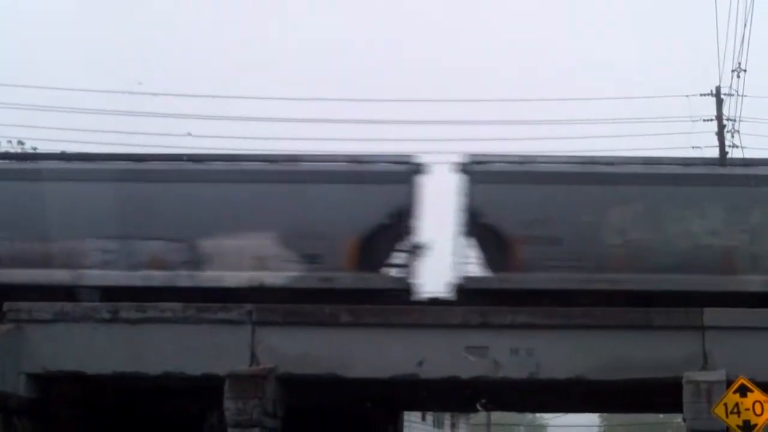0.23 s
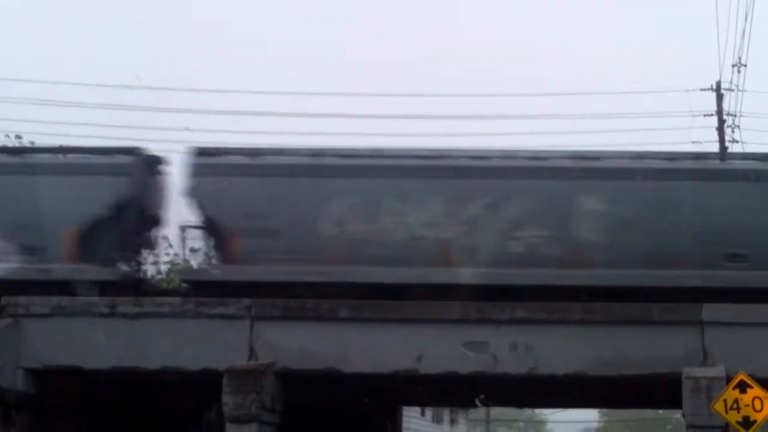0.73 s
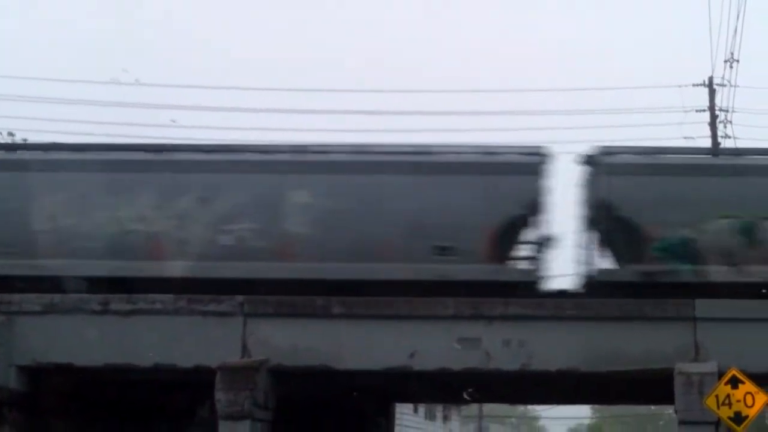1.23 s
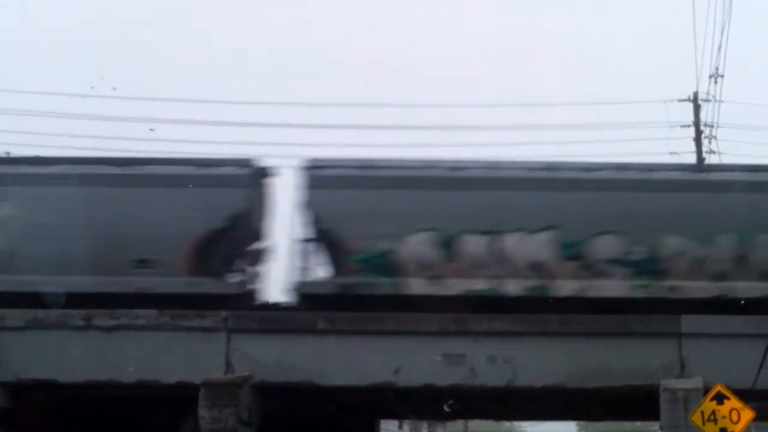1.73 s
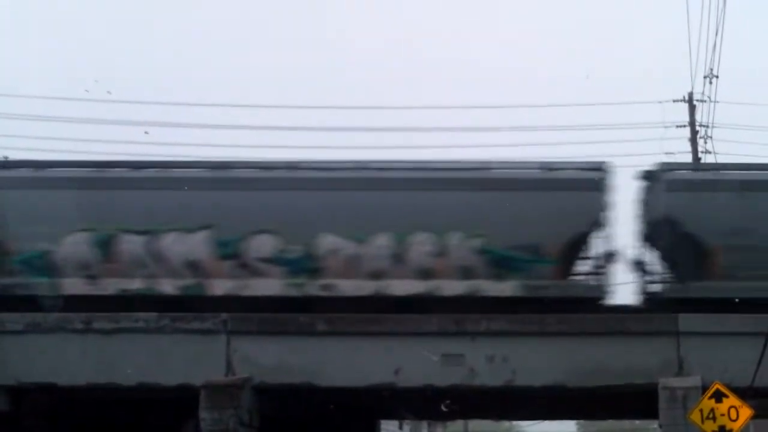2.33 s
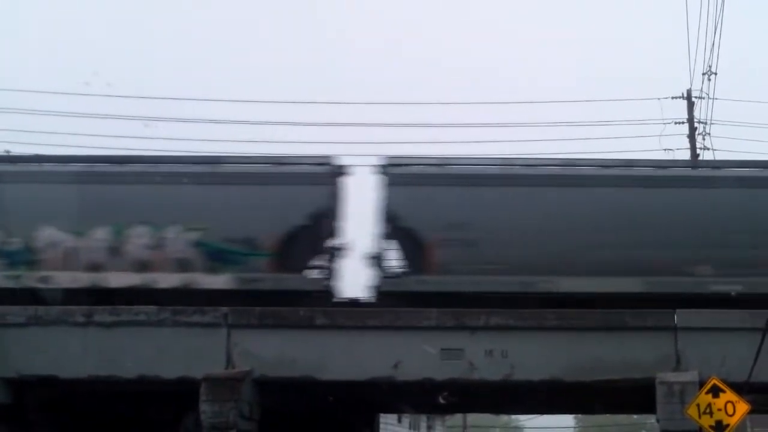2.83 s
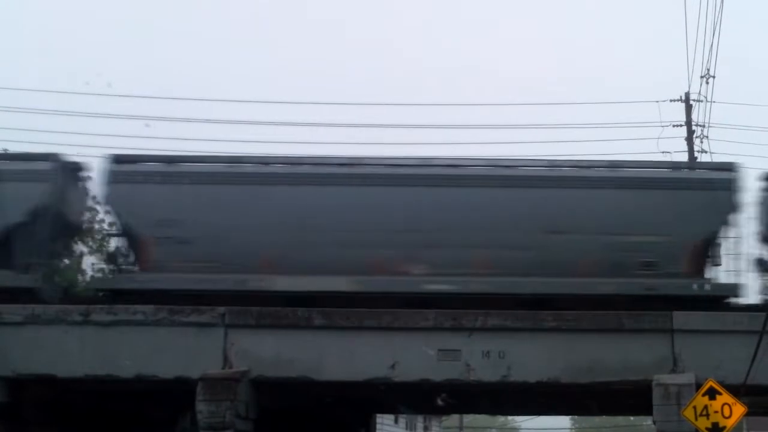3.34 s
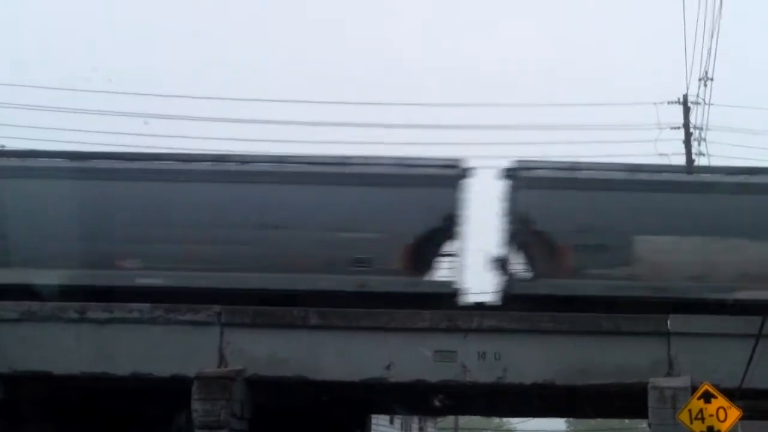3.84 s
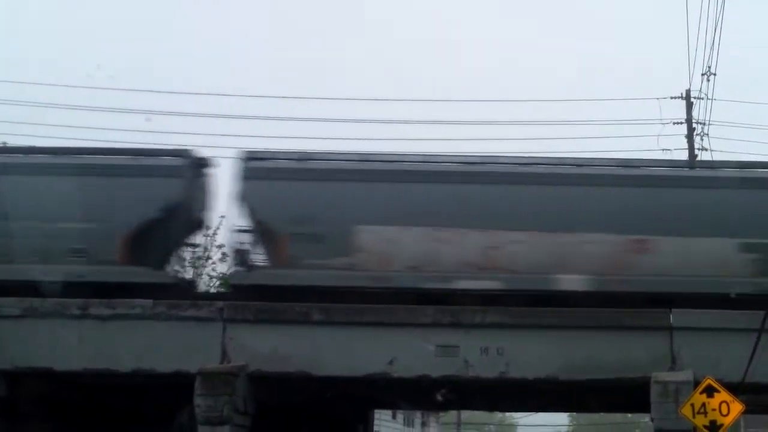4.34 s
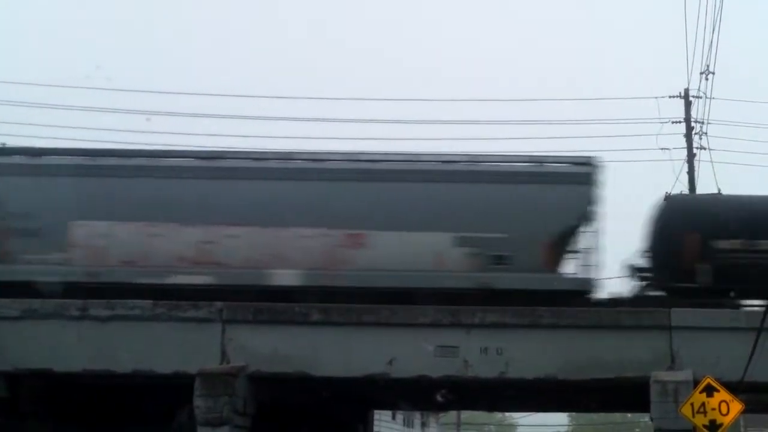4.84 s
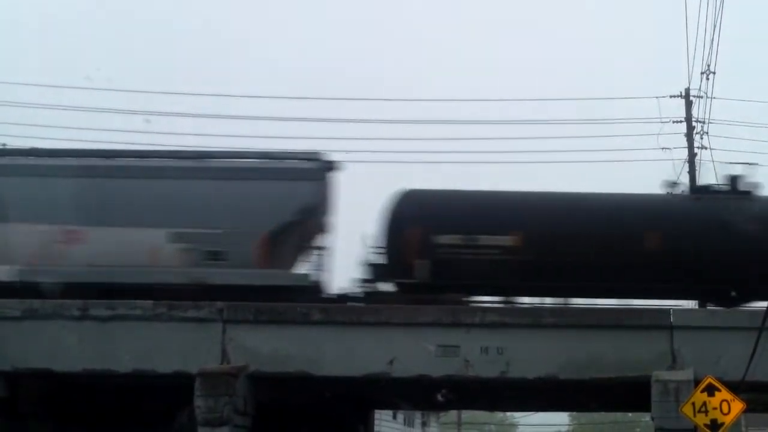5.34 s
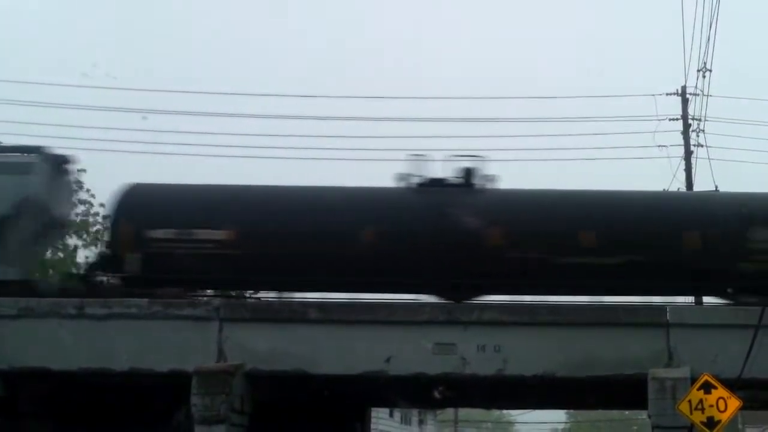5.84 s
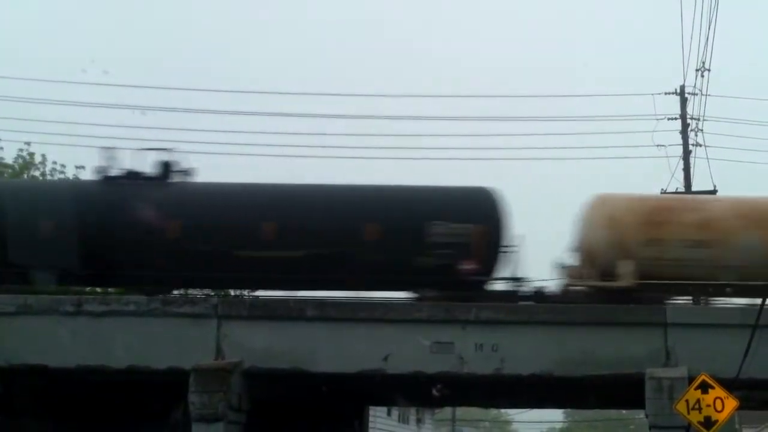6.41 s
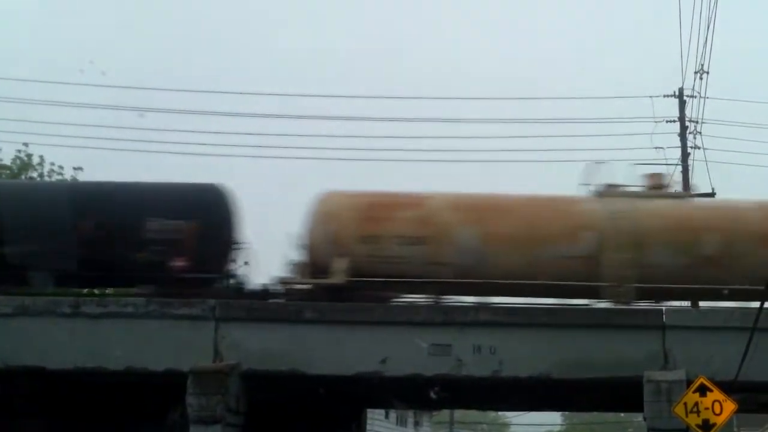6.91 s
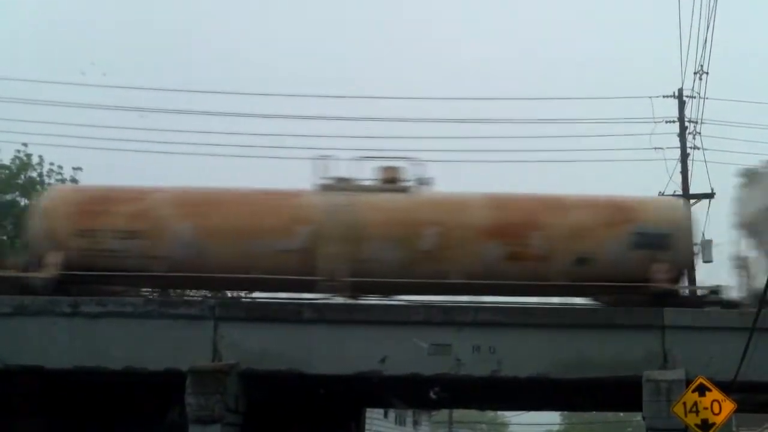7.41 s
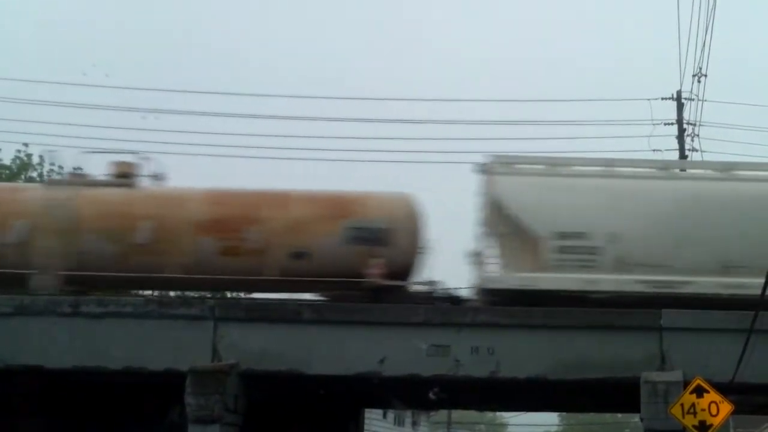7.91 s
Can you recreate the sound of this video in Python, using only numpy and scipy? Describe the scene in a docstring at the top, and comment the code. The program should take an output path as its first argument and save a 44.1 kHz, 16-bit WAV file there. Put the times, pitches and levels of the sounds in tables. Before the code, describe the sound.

A freight train is already crossing a bridge, heard close by outdoors. Throughout, sub-bass rumble and a fluttering 50-70 Hz deck boom sit beneath girder drone, mid-low wheel roar and bright gritty rail hiss. At 0.1 s a high squeal and whistle sing over flange sizzle; a clack lands at 0.2. Four clacks follow at 1.0-1.45, then a complex bright squeal with a low groan at 1.6-2.0. Harder clacks at 2.3-2.7 end in a sharp crack; a scraping squeal swells at 3.3. Strong clacks at 3.5-3.95 mix with squeals and a thud. Clacks at 4.8-5.2 begin weaker, as tank cars replace hoppers and the drone shifts; a thin squeal comes at 5.3. Clacks return at 6.0-6.4 and 7.3-7.7, with a girder boom at 7.2. A 440 Hz groan sings near 7.55, then sizzle and a faint squeal at 8.0 as rolling continues.

```python
"""Beside a street overpass, a freight train of hoppers and then tank cars rolls across the bridge.
Filtered noise makes the deck boom and the girders drone, and makes the wheels roar and hiss on the rails.
Axles clack over a joint, mostly four to a coupling: short blows ring the modes of a wheel.
Now and then a flange rubs the rail and sizzles; wheels squeal in rough modes or whistle clear tones."""
import sys
import numpy as np
from scipy import signal
from scipy.fft import rfft, irfft
from scipy.io import wavfile
from scipy.ndimage import uniform_filter1d, minimum_filter1d, map_coordinates

SR = 44100
rng = np.random.default_rng(int(sys.argv[2]) if len(sys.argv) > 2 else 0)


def dump(signal):
    """Clip the signal to [-1, 1] and save it as 16-bit WAV at the path in sys.argv[1]."""
    limited = np.clip(np.atleast_2d(signal).T, -1, 1)
    pcm = np.round(limited * 32767).astype(np.int16)
    wavfile.write(sys.argv[1], SR, pcm)


N = 359856
TIME = np.arange(N) / SR

# colour of steel scraping and slipping: pitch_hz, density_db (relative, per Hz)
SIZZLE_COLOUR = [(6000, -12), (8000, 10), (10000, 11.5), (11500, 3.5), (12600, 0.5), (14000, -4),
                 (15600, -6)]


def from_db(db):
    """Decibels to gain."""
    return 10 ** (np.asarray(db) / 20)


def rms_one(x):
    """Scale to unit power."""
    return x / np.sqrt(np.mean(x ** 2) + 1e-20)


def gains(rows):
    """The dB columns of a curve table as gains at every sample."""
    s, *columns = np.transpose(rows)
    return [from_db(np.interp(TIME, s, c)) for c in columns]


def noise(colour):
    """Unit-power noise of a given colour, silent beyond the ends of its table."""
    hz, db = np.transpose(colour)
    bins = np.maximum(np.arange(N // 2 + 1) * SR / N, 1)
    shape = from_db(np.interp(np.log(bins), np.log(hz), db, left=-np.inf, right=-np.inf))
    white = rng.standard_normal(N)
    return rms_one(irfft(rfft(white) * shape, N))


def resonate(force, modes):
    """Parallel two-pole resonances of alternating sign, each with its own gain at its peak."""
    out = 0
    for k, (hz, width_hz, db) in enumerate(modes):
        r = np.exp(-np.pi * width_hz / SR)
        poles = [1, -2 * r * np.cos(2 * np.pi * hz / SR), r * r]
        mode = (1 - r * r) / 2 * signal.lfilter([1, 0, -1], poles, force)
        out = out + (-1) ** k * from_db(db) * mode
    return out


def shaken(modes, size=N):
    """A body driven by random roughness, near its modes only."""
    hz = np.array(modes)[:, 0]
    edges_hz = [hz.min() * .75, min(hz.max() * 1.25, SR * .45)]
    band = signal.butter(2, edges_hz, "band", fs=SR, output="sos")
    roughness = signal.sosfilt(band, rng.standard_normal(size))
    return rms_one(resonate(roughness, modes))


def even(x, span_s):
    """Hold the power steady over stretches longer than the span."""
    size = max(int(span_s * SR), 2)
    power = uniform_filter1d(uniform_filter1d(x * x, size), size)
    return x / np.sqrt(np.maximum(power, 1e-9))


def flutter(db):
    """A gain that wavers a few times a second."""
    return from_db(db * noise([(1.5, 7.0), (6, -1.0), (14, -9), (30, -11.0)]))


def swell(s, length_s):
    """A smooth hump of height 1."""
    return np.exp(-((TIME - s) / length_s) ** 2)


def girder_booms():
    """One mode of the girders booms up for a moment."""
    # booming girder modes: peak_s, level_db, pitch_hz
    boom_events = [(1.13, -22.5, 178), (2.6, -28, 186), (3.66, -25, 163), (7.24, -20, 130)]
    width_hz, length_s = 43, 0.093
    out = 0
    for s, db, hz in boom_events:
        mode = even(shaken([(hz, width_hz, 0)]), span_s=0.11)
        out = out + from_db(db) * swell(s, length_s) * mode
    return out


def bridge(sub_db, boom_db, girder_db, broad_db):
    """The moving load shakes the deck in its low modes and the girders above them."""
    # load on the bridge, before trim and flutter: time_s, sub_db, deck_boom_db, girder_drone_db
    load = [(0, -15.5, -21.5, -23.5), (0.6, -18, -18.5, -24.5), (1.4, -15, -19, -29),
            (1.75, -22, -16.5, -28), (2.1, -20.5, -14.5, -24), (2.8, -19.5, -21.5, -29.5),
            (3.1, -16, -12.5, -28), (3.65, -23.5, -20.5, -26), (4.15, -21, -16, -26.5),
            (5.5, -24.5, -16, -25), (7, -22, -16, -24), (8.16, -36, -14.5, -25.5)]
    # tank cars take over from hoppers: time_s, share (0-1)
    tank_share = [(0, 0.02), (3.7, 0.08), (5.3, 0.89), (8.16, 0.85)]
    # resonances of the deck: pitch_hz, width_hz, level_db
    deck_modes = [(37.7, 14.5, -7), (53.5, 9.9, 0.5), (72.2, 6.7, -4.5)]
    # colour of the sub rumble: pitch_hz, density_db (relative, per Hz)
    sub_colour = [(5, -18), (13, -2.5), (23, -5.5), (35, 2), (42, -7), (60, -70)]
    # colour of the broad deck boom: pitch_hz, density_db (relative, per Hz)
    boom_colour = [(25, 3.5), (38, -4.5), (52, 9), (62, -13), (76, -1.5), (90, -1.5), (130, -45)]
    # girder drone under hoppers: pitch_hz, density_db (relative, per Hz)
    hopper_colour = [(60, -4), (92, 1), (106, -4), (118, -4), (145, 2), (170, 0.5), (195, 1), (220, -6),
                     (245, -13.5), (275, -11), (305, -26), (420, -36)]
    # girder drone under tank cars: pitch_hz, density_db (relative, per Hz)
    tank_colour = [(60, -31), (92, -5.5), (118, 5.5), (140, -0.5), (195, 0.5), (225, -7.5), (275, -6.5),
                   (305, -11.5), (350, -12.5), (430, -34), (500, -11.5), (550, -12.5), (600, -18)]

    sub, boom, drone = gains(load)
    sub = sub * flutter(db=2.0)
    boom = boom * flutter(db=2.5)
    drone = drone * flutter(db=1.3)
    booms = girder_booms()
    tanks = np.clip(np.interp(TIME, *np.transpose(tank_share)), 0, 1)
    deck = even(shaken(deck_modes) + from_db(broad_db) * noise(boom_colour), span_s=0.051)
    # equal-power crossfade from hoppers to tank cars
    girders = np.sqrt(1 - tanks) * noise(hopper_colour) + np.sqrt(tanks) * noise(tank_colour)
    girders = even(girders, span_s=0.23)
    rumble = from_db(sub_db) * sub * even(noise(sub_colour), span_s=0.16)
    return rumble + from_db(boom_db) * boom * deck + from_db(girder_db) * drone * girders + booms


def thuds():
    """A wheel drops into a loose joint: a sleeper's main mode and its overtone swell briefly."""
    # deck thuds: peak_s, level_db, length_s, pitch_hz
    thud_events = [(2.69, -27, 0.026, 476), (3.51, -28, 0.03, 497), (3.941, -22, 0.013, 440),
                   (4.82, -29.5, 0.04, 440), (7.19, -26, 0.028, 493)]
    # overtone of every thud: pitch_hz, width_hz, level_db
    overtone = (970, 31, -9)
    out = 0
    for s, db, length_s, hz in thud_events:
        body = even(shaken([(hz, 28, 0), overtone]), span_s=0.018)
        out = out + from_db(db) * swell(s, length_s) * body
    return out


def surges_and_dips_db():
    """Surges of the rolling noise, and brief dips of its level, in dB; each dip falls abruptly, then recovers."""
    # smooth surges: peak_s, rise_db, half_length_s
    surge_events = [(0.22, 3, 0.027), (0.622, 3.5, 0.031), (2.675, 4, 0.037), (3.572, 3.5, 0.13),
                    (3.936, 3, 0.1), (4.387, 1.5, 0.027), (4.848, 4.5, 0.034), (5.553, 1.5, 0.084),
                    (5.99, 3.5, 0.12), (6.823, 2, 0.034), (7.208, 5, 0.043), (7.674, 4, 0.059),
                    (7.976, 1.5, 0.014)]
    # abrupt level dips: start_s, depth_db, recovery_s
    dip_events = [(0.64, 4, 0.054), (1.25, 3, 0.17), (3.69, 7, 0.13), (4.429, 7.5, 0.19), (5.62, 6, 0.25),
                  (7.9, 2.5, 0.042)]
    onset_s = 0.0053
    surges = sum(db * swell(s, length_s) for s, db, length_s in surge_events)
    dips = 0
    for s, db, recovery_s in dip_events:
        dips = dips + np.interp(TIME - s, [0, onset_s, onset_s + recovery_s], [0, db, 0])
    return surges - dips


def flange_pressure():
    """Each rub of a flange on the rail builds up and dies away exponentially."""
    # flange rubs, before the sizzle and scrape trims: loudest_s, level_db, rise_s, fall_s
    rub_events = [(0.08, -44, 0.27, 0.3), (0.72, -55, .03, 0.16), (1.68, -43.5, 0.11, 0.22),
                  (2.7, -47.5, 0.0099, 0.21), (3.28, -42.5, 0.11, 0.24), (3.65, -49, 0.046, .1),
                  (3.88, -51, .1, 0.28), (5.32, -43.5, 0.18, 0.21), (6.83, -46, .02, 0.06),
                  (7.99, -46, 0.031, 0.75)]
    pressure = 0
    for s, db, rise_s, fall_s in rub_events:
        decay = np.maximum((s - TIME) / rise_s, (TIME - s) / fall_s)
        pressure = pressure + from_db(db) * np.exp(-decay)
    return pressure


def screech(width_hz, smooth_db):
    """Scraping noise, partly caught in the wheel's crowded high modes."""
    centres_hz = np.arange(6000, 15500, 320)
    centres_hz = centres_hz + rng.uniform(-110, 110, len(centres_hz))
    modes = [(hz, width_hz, 0) for hz in centres_hz]
    caught = rms_one(resonate(noise(SIZZLE_COLOUR), modes))
    return rms_one(caught + from_db(smooth_db) * noise(SIZZLE_COLOUR))


def rolling(roar_db, ring_db, hiss_db, sizzle_db, scrape_db, slip_db, sleeper_db, rail_db,
            tread_db, grit_db, roar_follows, ring_follows):
    """Rough treads excite sleepers, rail and wheels; a rubbing flange scrapes and adds a gritty sizzle."""
    # wheels on the rail, before trim, surges and dips: time_s, roar_db, ring_and_hiss_db
    rolling_levels = [(0, -29.5, -32), (1, -30, -33), (1.5, -32.5, -34), (3, -33.5, -35), (3.5, -33, -34.5),
                      (4.1, -32, -34), (5, -32.5, -35.5), (6.3, -31, -33.5), (7.4, -31.5, -33.5),
                      (8.16, -30.5, -33.5)]
    # resonances of the sleepers: pitch_hz, width_hz, level_db
    sleeper_modes = [(368, 51, -1), (432, 97, -1.5), (524, 52, -3), (681, 57, -8.5), (797, 52, -6.5),
                     (867, 76, -8), (988, 32, -10)]
    # resonances of the rail: pitch_hz, width_hz, level_db
    rail_modes = [(1465, 60, -3), (1597, 55, 1), (1745, 90, -3), (1910, 80, -3), (2170, 110, -3),
                  (2550, 160, -7), (2820, 140, -8)]
    # resonances of all rolling wheels: pitch_hz, width_hz, level_db
    tread_modes = [(3100, 120, -4), (3316, 200, -1.5), (3952, 92, 5), (4360, 230, 1), (4950, 210, -5.5),
                   (5500, 350, -6), (6330, 510, -5), (6820, 260, -1.5), (8120, 140, -0.5),
                   (9500, 950, -6.5)]
    # colour of the low roar: pitch_hz, density_db (relative, per Hz)
    roar_colour = [(230, -12.5), (300, -3.5), (370, 0.5), (450, 0.5), (540, -0.5), (620, -25), (690, -7.5),
                   (850, -6), (990, -9.5), (1080, -26), (1400, -19)]
    # colour of the middle ring: pitch_hz, density_db (relative, per Hz)
    ring_colour = [(750, -28), (1100, -0.5), (1500, -2.5), (2200, -3), (2900, -4), (3600, -2.5),
                   (5000, -38)]
    # colour of the high hiss: pitch_hz, density_db (relative, per Hz)
    hiss_colour = [(1710, -7), (2900, -6), (3380, -4.5), (3680, -7.5), (4780, 1), (6110, -1.5), (6780, -2),
                   (7490, -4), (8200, -5.5), (9310, -5.5), (12600, -27.5), (15500, -28)]

    roar, steel = gains(rolling_levels)
    change_db = surges_and_dips_db()
    flange = flange_pressure()
    steel = steel * flutter(db=0.83)
    roar = roar * from_db(roar_follows * change_db) * flutter(db=1.3)
    ring = steel * from_db(ring_follows * change_db)
    hiss = steel * from_db(change_db)

    slip = from_db(slip_db) * hiss * noise(SIZZLE_COLOUR)
    sizzle = flange * screech(width_hz=60, smooth_db=3) + slip
    # the contact force flutters quickly
    grit = from_db(grit_db * noise([(5, 11.5), (40, -6), (200, -17), (500, -36)]))

    low = roar * even(noise(roar_colour) + from_db(sleeper_db) * shaken(sleeper_modes), span_s=0.049)
    middle = ring * rms_one(noise(ring_colour) + from_db(rail_db) * shaken(rail_modes))
    wheel_tone = rms_one(noise(hiss_colour) + from_db(tread_db) * shaken(tread_modes))
    wheels = np.hypot(hiss, from_db(scrape_db) * flange) * wheel_tone
    top = from_db(hiss_db) * wheels + from_db(sizzle_db) * sizzle
    return from_db(roar_db) * low + grit * (from_db(ring_db) * middle + top)


def reflections(x, share, sway_s):
    """Passing car sides throw back early echoes, whose slowly changing delays ripple the colour."""
    out = x.copy()
    for delay_s in (.0037, .0066, .0112):
        path_s = delay_s + sway_s * noise([(.5, -6), (1.5, 15), (3, -18)])
        out += share * map_coordinates(x, [(TIME - path_s) * SR], order=3, mode="mirror")
    return out / np.sqrt(1 + 3 * share ** 2)


def clacks(ring_db, crack_db, chatter_db, rise_s, choke, echo_s, echo_db):
    """Each axle meets the rail end, strikes and chatters; a short blow chokes its ring; a car side echoes."""
    # axles at the joint, before trims: strike_s, wheel_ring_db, crack_db, clatter_length_s
    axles = [(0.2, -22.5, -27, 0.017), (1.039, -26.5, -35, 0.016), (1.165, -21.5, -30, 0.0084),
             (1.327, -33.5, -43, .012), (1.45, -28.5, -25, 0.012), (2.295, -26, -22, 0.023),
             (2.415, -27, -26, 0.04), (2.577, -28, -25, 0.017), (2.706, -24.5, -18.5, .007),
             (3.546, -25.5, -25, 0.025), (3.667, -23.5, -21, .009), (3.827, -25.5, -35, 0.0046),
             (3.955, -21.5, -21, 0.0027), (4.787, -38, -36, .015), (4.914, -32, -31, 0.011),
             (5.069, -31, -32, 0.014), (5.183, -29, -22, 0.029), (6.029, -29, -36, .01),
             (6.157, -28.5, -23, 0.012), (6.317, -31, -24.5, 0.049), (6.436, -26, -25.5, 0.028),
             (7.266, -27.5, -41, .01), (7.389, -27.5, -35, 0.019), (7.674, -25, -28, 0.0064)]
    # modes of a struck wheel, before choking widens them: pitch_hz, width_hz, level_db
    wheel_modes = [(1465, 45, -8), (1595, 30, 0), (1730, 60, -9), (1920, 40, -11), (2160, 45, -14),
                   (2500, 45, -21)]
    # crack of steel on steel: pitch_hz, density_db (relative, per Hz)
    crack_colour = [(350, 2), (900, 6), (1250, 1), (2000, 1), (2900, 4), (4500, -1), (6000, -8),
                    (10000, -12), (14000, -36)]

    out = np.zeros(N)
    crack = noise(crack_colour)
    lead = SR // 30   # samples before the strike
    age_s = (np.arange(SR // 5) - lead) / SR
    for s, wheel_db, hit_db, length_s in axles:
        blow = np.exp(-np.maximum(-age_s / rise_s, age_s / length_s))
        chatter = blow * rng.standard_normal(len(age_s))
        force = from_db(chatter_db) * chatter / np.linalg.norm(chatter)
        force[lead] += 1   # the impact itself
        choked = [(hz, width_hz + choke / length_s, db) for hz, width_hz, db in wheel_modes]
        ring = resonate(force, choked)
        ring /= np.sqrt(uniform_filter1d(ring ** 2, size=300).max())   # loudest moment at unit power
        at = int(s * SR) - lead + np.arange(len(age_s))
        out[at] += from_db(wheel_db + ring_db) * ring
        out[at] += from_db(hit_db + crack_db) * blow * crack[at]
    return out + from_db(echo_db) * np.interp(TIME - echo_s, TIME, out)


def whistles():
    """Steel sticks and slips in step with one mode: a clear tone, wavering a little in pitch and strength."""
    # singing tones: start_s, loudest_s, end_s, level_db, pitch_hz, glide_hz_per_s, waver_hz
    tones = [(0.04, 0.119, 0.2, -26, 4720, 400, 19), (1.57, 1.69, 1.8, -39, 3850, 0, 12),
             (1.635, 1.685, 1.73, -31, 5100, 0, 7.1), (1.569, 1.69, 1.8, -34, 5372, 0, 8),
             (1.597, 1.7, 1.82, -39, 6730, -100, 16), (1.82, 1.915, 2.02, -39.5, 6700, 0, 11),
             (1.661, 1.86, 2, -33, 426, -1, 4.4), (2.083, 2.12, 2.15, -37, 6760, 800, 20),
             (3.71, 3.778, 4.2, -40, 9717, 0, 14), (4.153, 4.195, 4.25, -35, 3040, -400, 6),
             (5.13, 5.328, 5.6, -38.5, 4335, -2, 15), (5.222, 5.35, 5.5, -43, 10904, -1, 34),
             (7.419, 7.57, 7.76, -27, 441.5, 0, 3), (7.42, 7.6, 7.76, -35.5, 880, 1, 11)]
    flutter_db = 2.5
    out = np.zeros(N)
    waver = noise([(3, 0), (30, 0), (120, -15)])
    strength = from_db(flutter_db * noise([(5, -6), (40, 1), (120, -15)]))
    for start, top, end, db, hz, glide, waver_hz in tones:
        at = np.arange(max(int(start * SR), 0), int(end * SR))
        own = (at + rng.integers(N)) % N   # each tone wavers in its own way
        rise_and_fall = np.interp(TIME[at], [start, top, end], [0, 1, 0])
        pressure = np.sin(np.pi / 2 * rise_and_fall) ** 2
        pitch_hz = hz + glide * (TIME[at] - top) + waver_hz * waver[own]
        tone = np.sqrt(2) * np.sin(2 * np.pi * np.cumsum(pitch_hz) / SR)
        out[at] += from_db(db) * pressure * strength[own] * tone
    return out


def squeals(level_db, fade, steady_s):
    """Steel rubbing on steel drives a few modes unevenly, swelling and dying away within a second."""
    # modes of each singing wheel: pitch_hz, width_hz, level_db
    SONG_A = [(3950, 90, -13), (4605, 60, -1), (4690, 50, -4), (4780, 80, -8), (8130, 350, -15.5),
              (11420, 120, -18), (11750, 300, -20.5)]
    SONG_B = [(3850, 30, -6), (4550, 50, -7), (5113, 40, -5), (5300, 300, -6), (5860, 25, -2),
              (6150, 50, -8), (6400, 40, -6), (6700, 70, -7), (7560, 30, -4), (8230, 25, 2), (9150, 45, -4),
              (9560, 60, -9), (10500, 50, -10), (11080, 50, -9), (12050, 40, -18), (12750, 250, -24),
              (13930, 35, -18)]
    SONG_B_LATE = [(3870, 40, -5), (4300, 16, 0), (5400, 60, -4), (5570, 40, -5), (6660, 30, -3),
                   (7535, 18, 3), (7800, 90, -9), (8400, 160, -4), (9170, 40, -2), (9340, 50, -3),
                   (10450, 50, -7), (11360, 70, -10), (12490, 35, -13), (12850, 250, -21), (13650, 80, -22),
                   (13900, 40, -19), (14500, 150, -24)]
    SONG_C = [(3990, 110, -4), (4650, 150, -8), (5600, 50, -5), (6170, 45, -2), (6370, 60, -4),
              (7920, 220, -5), (8200, 200, -9), (9900, 300, -12), (12070, 110, -15)]
    SONG_D = [(1900, 30, 0), (2150, 35, 2), (3730, 50, 0), (4420, 80, -1), (4970, 40, -2), (8350, 110, -9),
              (9000, 53, -9), (14530, 70, -16)]
    SONG_E = [(7980, 120, -11), (9715, 30, -6), (9800, 250, -14), (10400, 40, -13), (11500, 150, -21),
              (11900, 80, -23), (13150, 60, -24)]
    SONG_F = [(4340, 60, -8), (5400, 120, -8), (6430, 50, -8), (6920, 25, -4), (7560, 30, -11),
              (8250, 110, -5), (9400, 250, -10), (12400, 60, -23), (14100, 120, -22)]
    SONG_G = [(6770, 40, 0), (8100, 350, -6), (9700, 200, -9)]
    # a swivelling truck groans with a low tone and its overtones: pitch_hz, width_hz, level_db
    GROAN_LOW = [(420, 14, 0), (800, 45, -9), (1740, 140, -8)]
    GROAN_HIGH = [(439, 12, 0), (878, 22, -8), (1770, 120, -21), (2250, 120, -23)]
    # rubs, before the level trim: start_s, loudest_s, end_s, level_db, modes (pitch_hz, width_hz, level_db)
    # where end_s comes before loudest_s, the sound breaks off near its loudest
    squeal_events = [(-.14, 0.113, 0.42, -30.5, SONG_A), (.205, 0.23, 0.25, -29.5, [(8230, 70, 0)]),
                     (1.555, 1.595, 1.72, -31.5, [(4330, 16, 4), (4440, 20, 2), (5130, 40, -6),
                     (5330, 30, -2), (6380, 30, -4), (8200, 30, 0), (9560, 40, -7), (10520, 30, -7)]),
                     (1.59, 1.68, 1.84, -29.5, SONG_B), (1.68, 1.84, 2.04, -32, SONG_B_LATE),
                     (1.657, 1.82, 1.96, -31.5, GROAN_LOW), (2.07, 2.103, 2.1, -31, [(4700, 120, 2),
                     (5400, 300, -10), (8200, 200, -5)]), (3.14, 3.272, 3.5, -30, SONG_C),
                     (3.28, 3.345, 3.5, -33, [(1905, 30, 1), (2140, 45, -8), (2620, 40, -1),
                     (3880, 54, -8)]), (3.529, 3.607, 3.82, -33.5, SONG_D), (3.7, 3.765, 4.07, -37, SONG_E),
                     (3.76, 3.807, 3.9, -34, [(6210, 30, 0)]), (3.8, 3.928, 4.3, -34, GROAN_HIGH),
                     (3.95, 3.981, 3.98, -28, [(4650, 200, 0), (5450, 400, -4), (6350, 200, -4),
                     (6800, 200, -4), (8150, 200, -5)]), (4.45, 4.66, 4.82, -41, [(1610, 60, 3),
                     (1680, 60, -2)]), (4.21, 4.244, 4.36, -34, [(860, 36, 0)]),
                     (4.59, 4.63, 4.67, -43, [(10600, 60, 0)]), (4.901, 4.935, 5, -39, [(3360, 25, 0)]),
                     (5.15, 5.28, 5.62, -32, SONG_F), (5.222, 5.34, 5.62, -37, [(10920, 90, 0),
                     (11130, 120, -1), (11100, 500, -10)]), (5.47, 5.495, 5.5, -34, [(6460, 40, 0)]),
                     (7.44, 7.564, 7.9, -31, GROAN_HIGH), (7.928, 7.967, 8.25, -33.5, SONG_G)]

    out = np.zeros(N + SR)
    for start, top, end, db, modes in squeal_events:
        at = max(int(start * SR), 0) + np.arange(SR)
        pressure = np.interp(at / SR, [start, top, end], [0, 1, 0]) ** abs(fade)
        out[at] += from_db(db + level_db) * pressure * even(shaken(modes, size=SR), steady_s)
    return out[:N]


def scene():
    """Bridge, track and wheels together."""
    deck = bridge(sub_db=-0.5, boom_db=0.5, girder_db=0.0, broad_db=-5.0)
    track = rolling(roar_db=-1.0, ring_db=-0.5, hiss_db=-1.5, sizzle_db=6.0, scrape_db=11.0, slip_db=-22.5,
                    sleeper_db=0.5, rail_db=-2.0, tread_db=-3.0, grit_db=0.8,
                    roar_follows=0.97, ring_follows=1.0)
    joint = clacks(ring_db=0.6, crack_db=-3.5, chatter_db=4, rise_s=0.004, choke=0.08,
                   echo_s=0.036, echo_db=-12)
    track = reflections(track, share=0.044, sway_s=.00008)
    singing = whistles() + squeals(level_db=-0.27, fade=0.91, steady_s=0.039)
    mix = deck + track + joint + thuds() + singing
    return mix[None]


def record(dry, ceiling=0.57, release_db_per_s=40):
    """A limiter ducks under the biggest swings and recovers steadily; the top is cut."""
    cutoff_hz = 15700
    over_db = 20 * np.log10(np.maximum(np.abs(dry[0]) / ceiling, 1))
    release_db = release_db_per_s * TIME
    held_db = np.maximum.accumulate(over_db + release_db) - release_db
    # duck slightly ahead of each peak, then smooth the gain
    gain = uniform_filter1d(minimum_filter1d(from_db(-held_db), size=200), size=200)
    low_pass = signal.ellip(12, .1, 90, cutoff_hz, fs=SR, output="sos")
    return signal.sosfilt(low_pass, dry * gain)


dry = scene()
out = record(dry)
dump(out)
```